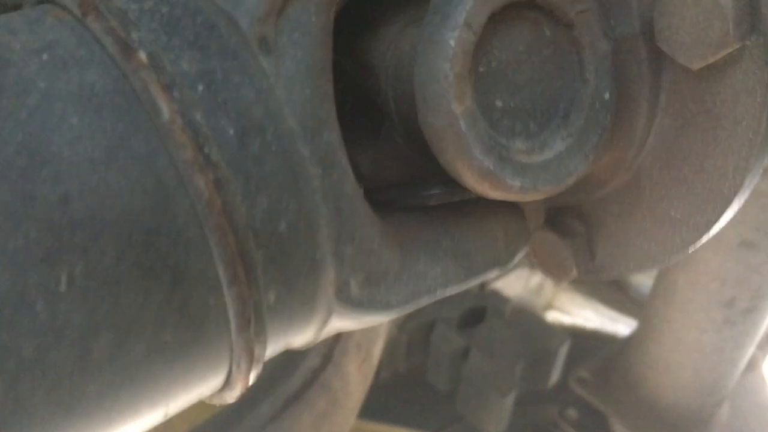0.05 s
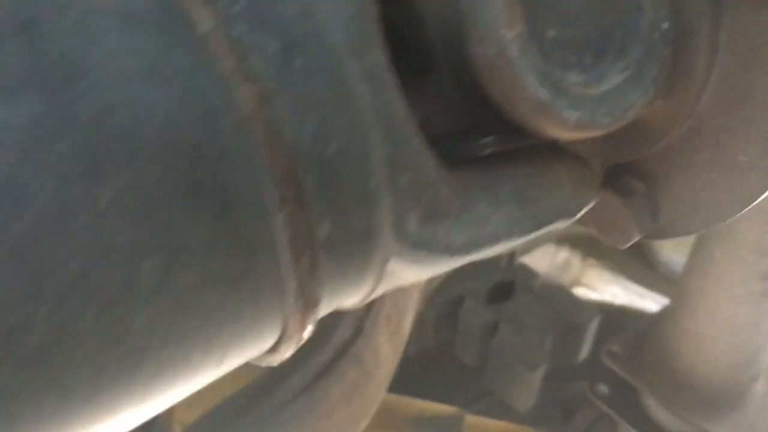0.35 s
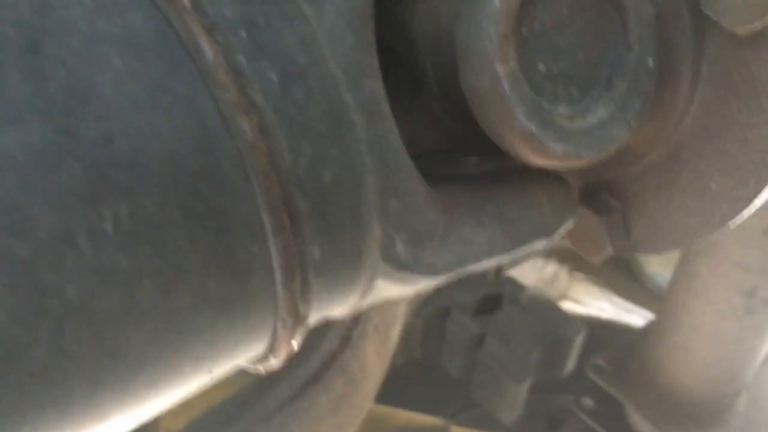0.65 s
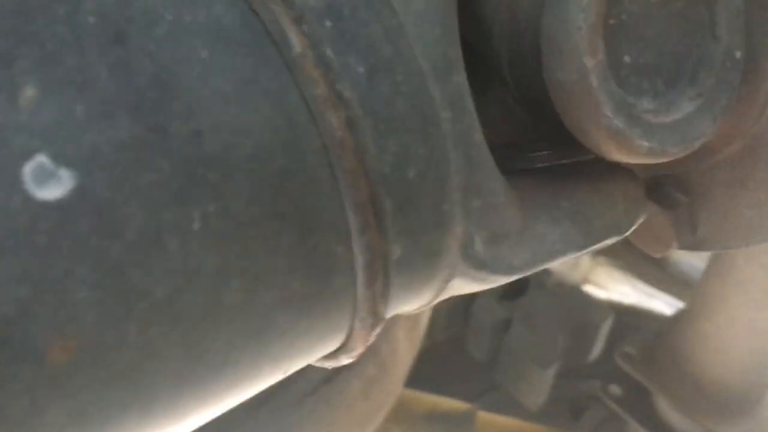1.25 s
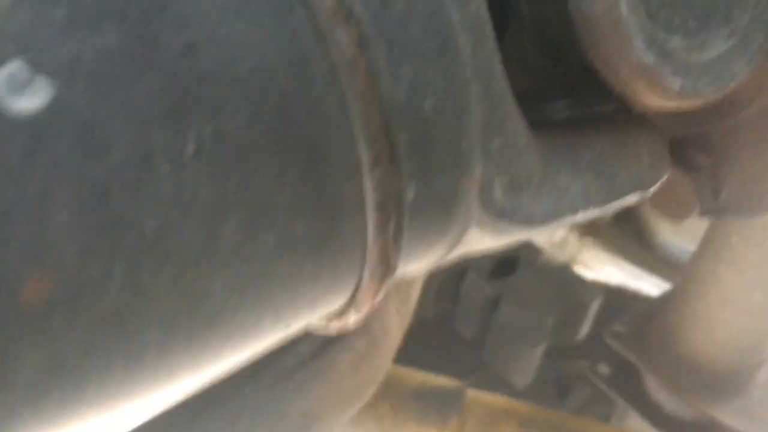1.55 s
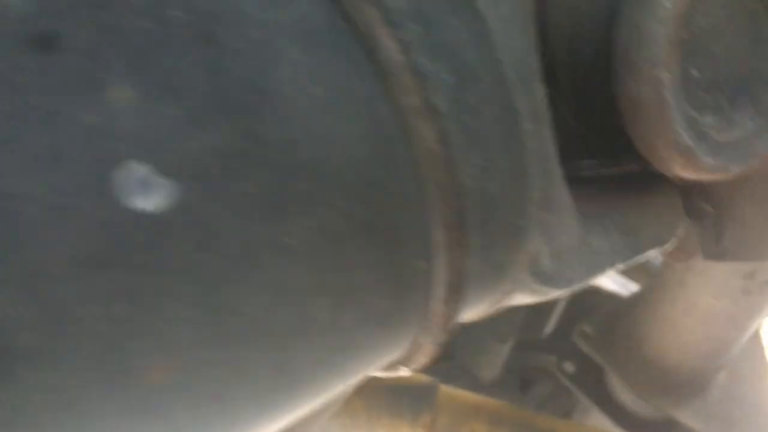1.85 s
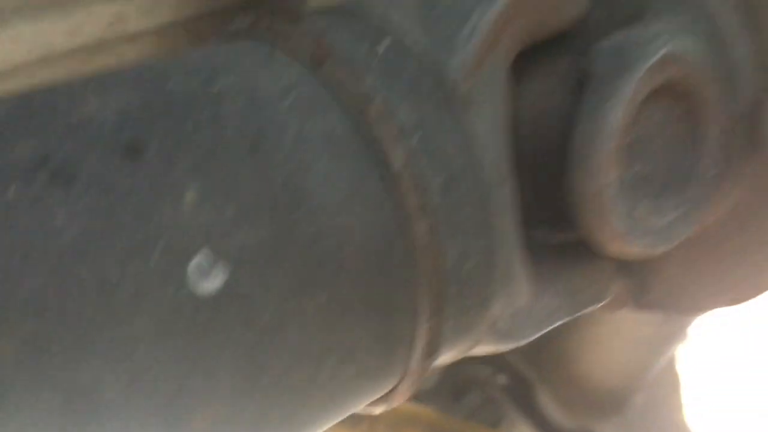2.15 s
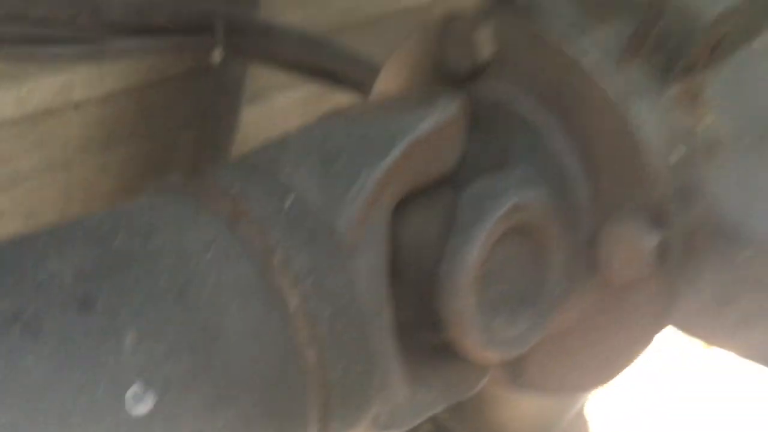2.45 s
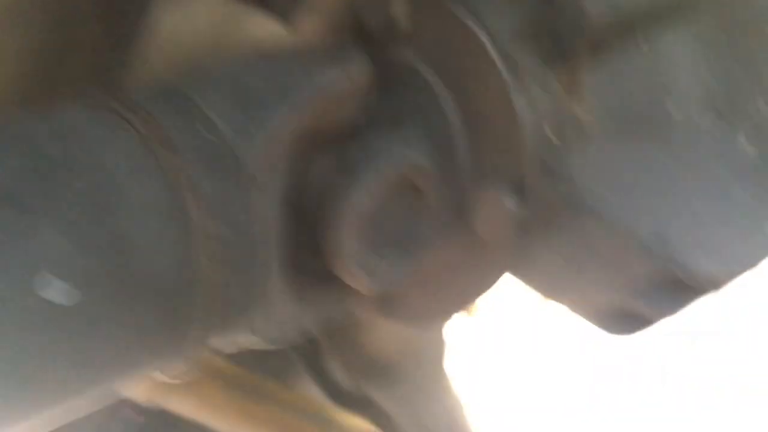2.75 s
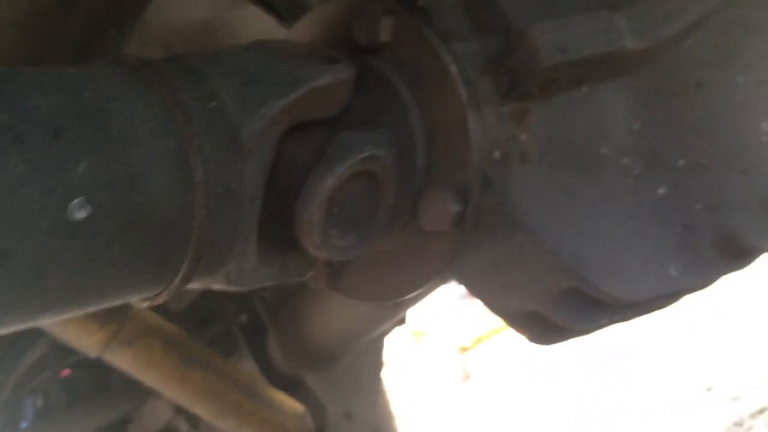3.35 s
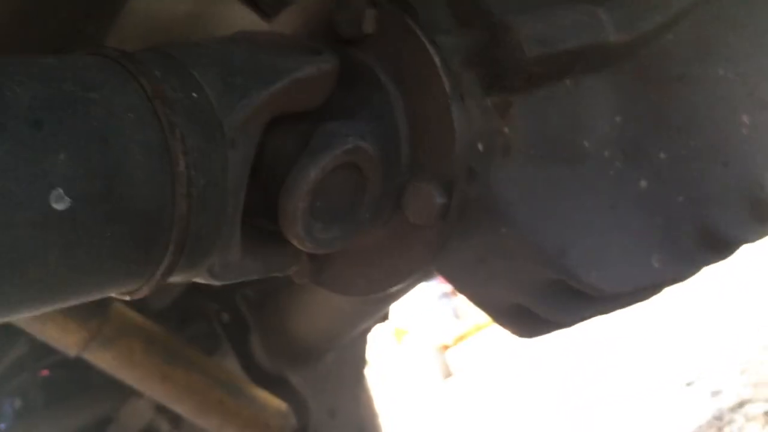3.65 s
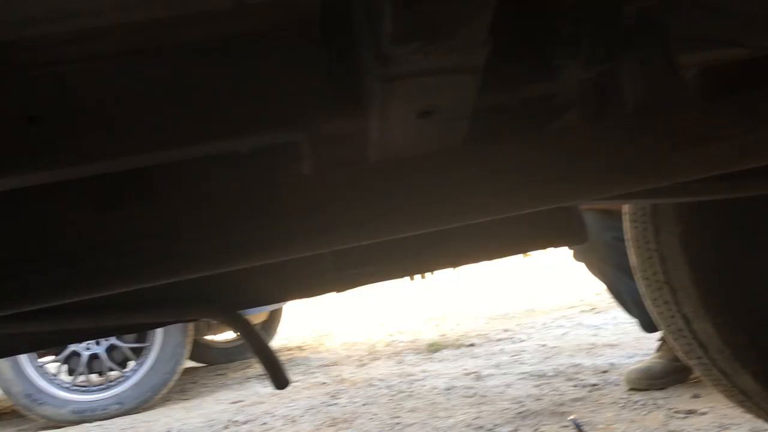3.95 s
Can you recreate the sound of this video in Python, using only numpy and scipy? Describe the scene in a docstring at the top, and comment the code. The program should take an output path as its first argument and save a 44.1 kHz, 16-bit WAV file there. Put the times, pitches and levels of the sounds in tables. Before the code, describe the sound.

Close under a vehicle, loose metal knocks come from a driveshaft being twisted by hand, each ringing briefly with a dull thud. The knocking stops, cloth drags by for a second, and a faint rumble remains.

```python
"""Under a vehicle, over a faint rumble, a hand rubs on the driveshaft and rocks it through its play.
For a second and a half each turn ends in metal clacks that ring in the tube and rattle the joints;
the heavy drivetrain answers with a low shudder and a sleeve brushes along. The hardest blow sets a
panel booming. After a short swish the sleeve scrapes past for a second as the arm draws back.
One more swish and a few small ticks follow, and the rumble remains."""
import sys
import numpy as np
from scipy import signal
from scipy.fft import rfft, irfft
from scipy.io import wavfile

SR = 44100
rng = np.random.default_rng(int(sys.argv[2]) if len(sys.argv) > 2 else 0)


def log_audio(samples):
    """Write samples as a 16-bit WAV file to the path given in sys.argv[1]."""
    # one column per channel
    frames = np.atleast_2d(samples).T
    # limit to full scale, then quantise
    limited = np.clip(frames, -1, 1)
    pcm = np.round(limited * 32767).astype(np.int16)
    wavfile.write(sys.argv[1], SR, pcm)


N = 176400
T = np.arange(N) / SR

# The shaft takes up its play. Each row: start in seconds, level in dB, hardness of the contact as a
# cut-off in Hz, rattle trim in dB, thunk in dB relative to the ring, thunk pitch in Hz.
KNOCKS = [(0.0415, -27.5, 2360, -1, 0.5, 437), (.107, -46, 800, 5, 6, 377), (.119, -32.5, 2600, 2, -4, 570),
          (.1325, -36, 3000, 0.5, 7, 580), (0.3745, -25.5, 5000, -1, 8.5, 523),
          (.412, -32.5, 1920, 7.5, 8, 510), (.424, -37, 2720, 12, 1, 536), (0.433, -41.5, 6400, 10, 0, 496),
          (.622, -31.5, 2460, 3, 4.5, 480), (0.891, -43, 1700, 7, 2.5, 592),
          (0.916, -25, 2870, -2, 1.5, 480), (1.127, -43, 900, -3, 4, 386), (1.1475, -32.5, 3080, 3, 7, 443),
          (1.170, -41.5, 1410, 5, -14, 640), (1.389, -38.5, 1600, -7, -10, 560),
          (1.432, -44.5, 2650, 8.5, 2.5, 576), (2.804, -55.5, 2400, 4, 7.5, 800)]
# Quick flicks of the sleeve. Each row: middle in seconds, half length in seconds, level in dB.
SWISHES = [(1.531, 0.011, -55.5), (2.828, 0.01, -59.5)]


def from_db(db):
    """Decibels to gain."""
    return 10 ** (np.asarray(db) / 20)


def noise(colour, peaks=(), peak_width_hz=65):
    """Noise of rms 1 with the given colour and resonances."""
    hz, db = np.transpose(colour)
    f = np.maximum(np.arange(N // 2 + 1) * SR / N, 1)
    lift_db = sum(lift * np.exp(-((f - centre) / peak_width_hz) ** 2) for centre, lift in peaks)
    gain = from_db(np.interp(np.log(f), np.log(hz), db) + lift_db) * np.minimum(f / hz[0], 1) ** 2
    return irfft(rfft(rng.standard_normal(N)) * gain, N) / np.sqrt(np.mean(gain ** 2))


def drift(per_second):
    """A random wander with a spread of about 1."""
    return np.interp(T * per_second, np.arange(4000), rng.standard_normal(4000))


def decay(age, t60):
    """A fall of 60 dB every t60 seconds."""
    return from_db(-60 * age / t60)


def attack(age, rise_s):
    """A rounded rise from 0 to 1."""
    return 1 - np.exp(-age / rise_s)


def dying(start, t60):
    """Silence until the start time, then a decay."""
    return (T >= start) * decay(np.clip(T - start, 0, 4 * t60), t60)


def cut(x, hz, kind, order=2):
    """A low- or high-pass, gentle by default."""
    return signal.sosfilt(signal.butter(order, hz, kind, fs=SR, output="sos"), x + 1e-18)


def add(out, s, sound):
    """Mix a sound in at s seconds."""
    start = int(s * SR)
    out[start:start + len(sound)] += sound


def struck(modes, age, scatter_db=2.5):
    """Metal modes after one blow, each with a strength and phase of its own."""
    ring = np.zeros(len(age))
    for hz, db, t60 in modes:
        strength = from_db(db + scatter_db * rng.standard_normal())
        ring += strength * decay(age, t60) * np.sin(2 * np.pi * (hz * age + rng.random()))
    return ring * attack(age, rise_s=0.0027)


def strokes(rows, colour):
    """Soft, bell-shaped swells of friction noise."""
    swells = sum(from_db(db) * np.exp(-0.5 * ((T - s) / half) ** 2) for s, half, db in rows)
    return noise(colour) * swells


def background(hum_hz=152.7):
    """The bed: far rumble with a wavering hum, and a thin hiss."""
    # Colours of rumble and hiss. Each row: frequency in Hz, relative level in dB.
    rumble = [(35, -9), (53, 6), (75, -3.5), (110, -6.5), (200, -14), (350, -19), (470, -32), (600, -27),
              (780, -35.5), (1100, -36), (1500, -40.5), (2500, -60), (5000, -62.5)]
    hiss = [(2000, 1.5), (5500, -9.5), (6300, -3), (7100, 5), (7900, -3), (9000, -11), (16000, -43)]
    hum = np.sin(2 * np.pi * hum_hz * T + drift(5.7)) * (1 + 0.6 * drift(2.5))
    return from_db(-46) * noise(rumble) + from_db(-59) * hum + from_db(-77) * noise(hiss)


def rubs(grain_db=3.5):
    """Palm and cuff rasp on the tube, catching and letting go."""
    # The hand's moves. Each row: middle in seconds, half length in seconds, level in dB.
    moves = [(.025, 0.031, -58.5), (.28, 0.27, -67), (.57, 0.024, -78), (2.4, 0.15, -61.5),
             (2.645, 0.079, -60)]
    # Colour of the rasp. Each row: frequency in Hz, relative level in dB.
    colour = [(500, -10), (1100, -15.5), (1700, -5), (2400, -7.5), (2700, -17.5), (4000, -21.5),
              (16000, -35)]
    return strokes(moves, colour) * from_db(grain_db * drift(per_second=260))


def clacks():
    """The splines meet with a dull thunk and ring the shaft; a softer contact is darker."""
    # The bright, quickly damped ring of the contact, then the longer modes of shaft and axle.
    # Each row: frequency in Hz, relative level in dB, time to fall 60 dB in seconds.
    contact_modes = [(880, 2, 0.013), (1856, -8.5, 0.013), (3190, -14.5, 0.016), (4170, -16, 0.029),
                     (5100, -21.5, 0.031)]
    shaft_modes = [(214, -21, .22), (301, -10, .27), (358, -18, .14), (430, -17, .07), (492, -11, .13),
                   (579, -5.5, .15), (680, -16, .14), (800, -16, .13), (1163, -25, .18), (1340, -21, .15),
                   (1590, -22, .18), (2135, -26, .12), (2385, -24, .11), (2875, -23, .06)]
    out, age = np.zeros(N + SR), T[:SR // 2]
    thunk_shape = attack(age, rise_s=0.00079) * decay(age, t60=0.021)
    for s, db, hardness_hz, _, thunk_db, thunk_hz in KNOCKS:
        thunk = from_db(thunk_db) * thunk_shape * np.cos(2 * np.pi * thunk_hz * age)
        ring = struck(contact_modes + shaft_modes, age)
        add(out, s, from_db(db) * cut(ring + thunk, hardness_hz, "low"))
    return out[:N]


def rattle():
    """Joints and underbody ring densely after each knock, with a faint longer tail."""
    # Colour of the dense ring. Each row: frequency in Hz, relative level in dB.
    colour = [(70, -12), (110, 2.5), (250, -8.5), (420, 0.5), (650, -14), (1000, -11), (2000, -18),
              (3000, -21.5), (5000, -29), (9000, -34), (16000, -40)]
    out, age, wash = np.zeros(N + SR), T[:SR], noise(colour)
    rise = attack(age, rise_s=0.00087)
    tail = from_db(-38) * decay(age, t60=1)
    for s, db, hardness_hz, trim_db, *_ in KNOCKS:
        body = from_db(trim_db - 11) * decay(age, t60=0.16)
        texture = cut(np.roll(wash, rng.integers(N))[:SR], hardness_hz, "low")
        add(out, s, from_db(db) * rise * (body + tail) * texture)
    return out[:N]


def tube(ring_cycles=1480, split_hz=1660):
    """The steel tube sings on faintly: low partials after knocks, high ones after the first swish."""
    # The tube's partials in Hz; each takes the same number of cycles to fall 60 dB.
    tube_hz = [1168, 1427, 1507, 1588, 1900, 2008, 3445, 3620, 3935, 4020, 6616, 6869]
    partials = [(hz, 0, ring_cycles / hz) for hz in tube_hz]
    out, age = np.zeros(N + SR), T[:SR // 2]
    for s, db, *_ in KNOCKS:
        add(out, s, from_db(db - 42) * cut(struck(partials, age), split_hz, "low"))
    s, _, db = SWISHES[0]
    add(out, s, from_db(db - 19.5) * cut(struck(partials, age), split_hz, "high"))
    return out[:N]


def shudders(shudder_hz=57.1, sway_hz=45.7, rise_s=0.016):
    """The drivetrain swings on its mounts for a few cycles, leaving a softer, deeper sway."""
    # Jolts to the drivetrain. Each row: start in seconds, level in dB.
    jolts = [(0.057, -29), (0.144, -28), (0.416, -18.5), (0.636, -28), (0.939, -30.5), (1.176, -30)]
    out = np.zeros(N)
    for s, db in jolts:
        age = np.maximum(T - s, 0)
        swell = (age / rise_s * np.exp(1 - age / rise_s)) ** 1.2
        out += from_db(db) * swell * np.sin(2 * np.pi * shudder_hz * age)
        settle = attack(age, rise_s) * dying(s, t60=0.69)
        out += from_db(db - 7) * settle * np.sin(2 * np.pi * sway_hz * age)
    return out


def brushes():
    """The sleeve brushes along softly with each turn."""
    # The sleeve's moves. Each row: middle in seconds, half length in seconds, level in dB.
    moves = [(.11, 0.035, -60.5), (.41, 0.034, -62), (.66, 0.083, -68), (.98, 0.034, -58.5),
             (1.19, 0.063, -63.5), (1.4, 0.033, -62.5), (1.55, 0.11, -69.5)]
    # Colour of the cloth. Each row: frequency in Hz, relative level in dB.
    colour = [(300, 5), (1500, 7), (3200, -1), (9000, -7), (16000, -14.5)]
    return strokes(moves, colour)


def ticks():
    """Small contacts tick, each a brief band of noise."""
    # Each row: start in seconds, level in dB, centre in Hz, width as a ratio to either side.
    contacts = [(0.107, -56.5, 7440, 1.8), (0.1315, -41.5, 2030, 0.79), (0.3768, -57, 7500, 2.1),
                (0.413, -57.5, 10000, 1.9), (0.892, -53, 1790, 1.23), (0.916, -58, 9500, 2.3),
                (1.126, -52, 1850, 1.06), (1.389, -50, 1820, 0.94), (2.805, -57.5, 6000, 2),
                (3.388, -62, 4100, 1.18), (3.905, -58, 900, 1.3)]
    out = np.zeros(N)
    for s, db, hz, width in contacts:
        width = max(width, 1.05)  # the narrowest ticks are almost pitched
        band = signal.butter(2, [hz / width, hz * width], "band", fs=SR, output="sos")
        burst = signal.sosfilt(band, rng.standard_normal(N))
        out += from_db(db) * dying(s, t60=0.025) * burst / burst.std()
    return out


def boom(start_s=0.403, hz=121.8):
    """One low panel mode rings on after the hardest blow."""
    return from_db(-34.5) * dying(start_s, t60=1) * np.sin(2 * np.pi * hz * (T - start_s))


def swishes():
    """Cloth flicks past in short, bright swishes."""
    # Colour of a swish. Each row: frequency in Hz, relative level in dB.
    colour = [(500, 4), (2500, 5.5), (8000, 3), (16000, -3)]
    return strokes(SWISHES, colour)


def scrape():
    """The sleeve drags along: a smooth rush in a hollow space, a little brighter at both ends."""
    # The fader ride and the treble lift. Each row: time in seconds, gain in dB.
    ride = [(1.73, -72.5), (1.82, -57), (1.89, -56), (2.04, -61.5), (2.17, -58), (2.33, -55), (2.67, -57.5),
            (2.75, -61), (2.79, -72), (3.05, -71), (3.4, -85)]
    treble_lift = [(1.85, 4), (2.4, 1), (2.7, 3.5)]
    # Colour of the drag, then resonances under the floor. Each row: frequency in Hz, gain in dB.
    colour = [(300, -23), (600, -0.5), (1000, -0.5), (1500, -5), (2300, -10.5), (2650, -9), (3500, -7),
              (4900, -14), (6400, -12.5), (7800, -18), (9300, -17.5), (16000, -23.5)]
    hollow = [(600, 1.5), (1005, 7.5), (1410, 9), (1590, 8.5), (1800, 6), (1960, 12), (2150, 9.5),
              (2390, 9)]
    level = from_db(np.interp(T, *np.transpose(ride), left=-120, right=-120))
    treble_gain = from_db(np.interp(T, *np.transpose(treble_lift)))
    rush = noise(colour, hollow)
    treble = cut(rush, 4600, "high", order=1)
    return level * (rush + treble * (treble_gain - 1))


def scene():
    """Shaft, hand, sleeve and background in one mono mix."""
    shaft = clacks() + rattle() + tube() + shudders() + boom()
    handling = brushes() + rubs() + swishes() + scrape() + ticks()
    return (shaft + handling + background())[None]


def record(dry):
    """A quick fade-in; the deepest bass is rolled off and the top is cut steeply."""
    fade_s, low_cut_hz, high_cut_hz = 0.003, 43, 15700
    heard = cut(dry * np.minimum(T / fade_s, 1), low_cut_hz, "high", order=4)
    return signal.sosfilt(signal.ellip(12, 0.1, 80, high_cut_hz, fs=SR, output="sos"), heard)


dry = scene()
out = record(dry)
log_audio(out)
```